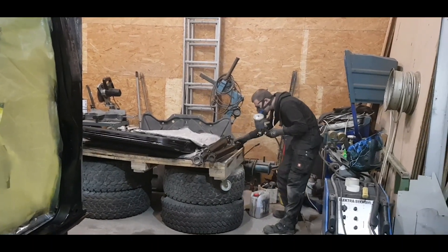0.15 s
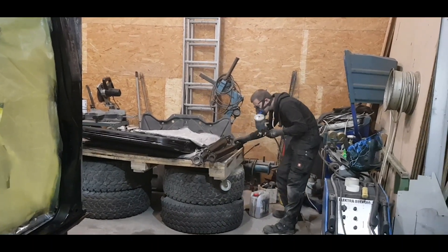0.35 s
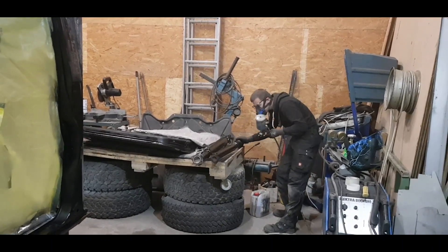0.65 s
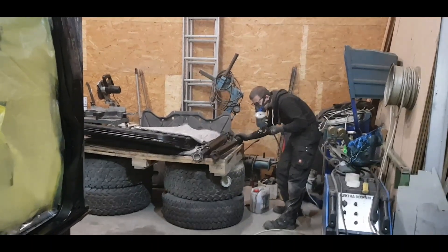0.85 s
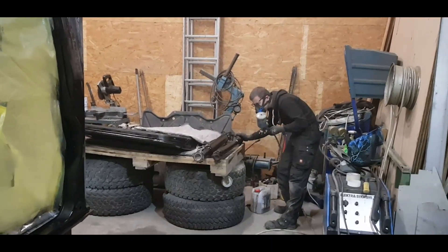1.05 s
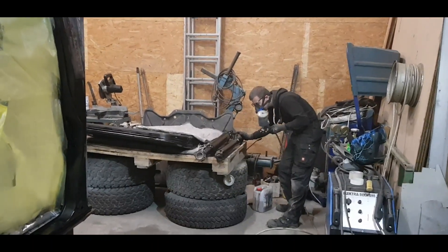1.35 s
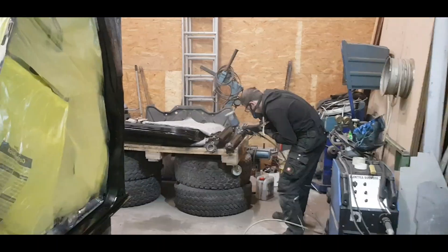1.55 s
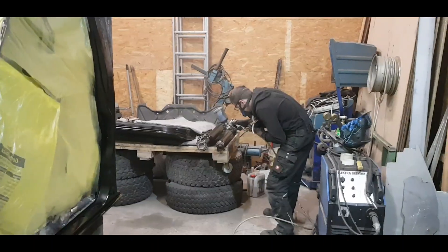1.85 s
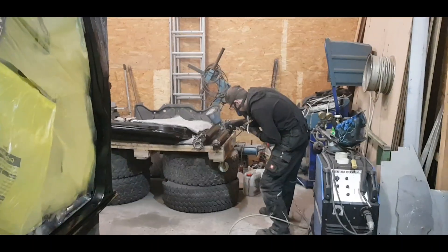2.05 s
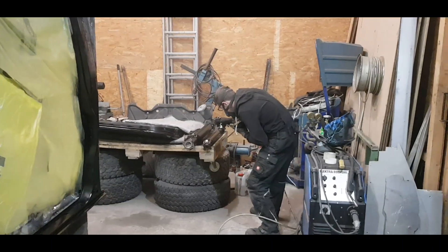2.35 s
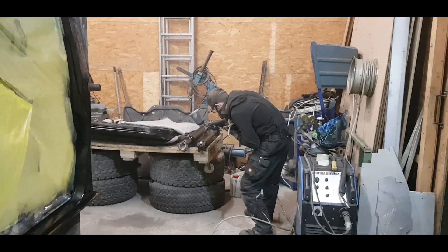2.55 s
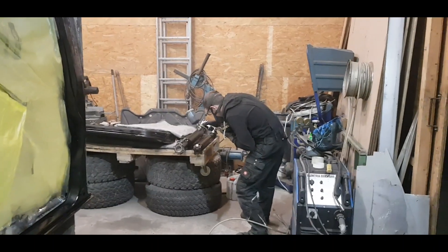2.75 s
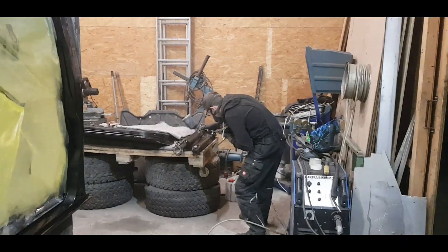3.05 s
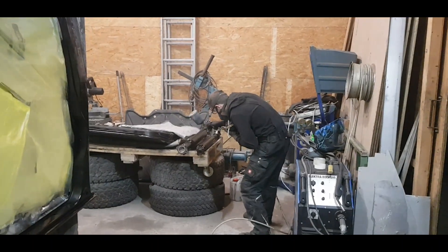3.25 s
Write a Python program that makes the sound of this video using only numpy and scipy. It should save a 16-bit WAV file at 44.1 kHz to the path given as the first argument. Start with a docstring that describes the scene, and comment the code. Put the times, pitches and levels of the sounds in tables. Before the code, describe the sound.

A spray gun hisses in four short bright bursts after a droning compressor cuts out abruptly.

```python
"""A compressor drones, its intake honking once a turn, over a steady hiss of air, then cuts out abruptly.
After a silent gap a spray gun paints in four short, bright passes, the first already under way.
Soft low puffs mark some moves of its valve, and the room rings briefly after each pass.
Drone and honk are sine waves timed by one shaft; air and spray are coloured stereo noise."""
import sys
import numpy as np
from scipy import signal
from scipy.fft import rfft, irfft, next_fast_len
from scipy.io import wavfile
from scipy.ndimage import map_coordinates

SR = 44100
rng = np.random.default_rng(int(sys.argv[2]) if len(sys.argv) > 2 else 0)


def materialize(psi):
    """Save the field psi as 16-bit PCM at rate SR to the path in sys.argv[1].

    A 1-D psi becomes a single channel; in a 2-D psi each row is a channel.
    """
    bounded = np.clip(np.atleast_2d(psi).T, -1, 1)
    quanta = np.round(bounded * 32767).astype(np.int16)
    wavfile.write(sys.argv[1], SR, quanta)


N = 149940  # 3.4 s

# How alike left and right are in the air and the room tone.
# Each row: frequency in Hz, left-right correlation (1 = mono, 0 = unrelated).
AIR_LIKENESS = [(150, 0.95), (400, 0.55), (800, 0.25), (1200, 0.12), (3000, 0)]


def amp(db):
    """Decibels to amplitude."""
    return 10 ** (np.asarray(db) / 20)


def unit(x):
    """Scale to an rms of 1."""
    return x / np.sqrt(np.mean(x ** 2) + 1e-20)


def seconds():
    """The time of every sample, in seconds."""
    return np.arange(N) / SR


def along(points, hz):
    """Read a curve of (Hz, value) points along a log frequency axis."""
    point_hz, value = np.transpose(points)
    return np.interp(np.log(hz + 1), np.log(point_hz + 1), value)


def wobble(rate):
    """A smooth random curve with the given number of knots a second."""
    knots = rng.standard_normal(int(N * rate / SR) + 4)
    return map_coordinates(knots, [seconds() * rate])


def filtered(x, response):
    """Shape the spectrum of x by a response given as a function of frequency in Hz."""
    size = next_fast_len(N + SR // 2)
    shaped = rfft(x, size) * response(np.fft.rfftfreq(size, 1 / SR))
    return irfft(shaped, size)[..., :N]


def rush(spectrum, alike, balance=None):
    """Stereo noise of rms 1: mid and side noise mixed to set colour, likeness and balance."""
    def mid_side_gain(hz):
        # cos^2 - sin^2 of this angle is the left-right correlation
        angle = np.arccos(np.clip(along(alike, hz), -1, 1)) / 2
        return amp(along(spectrum, hz)) * [np.cos(angle), np.sin(angle)]

    mid, side = filtered(rng.standard_normal((2, N)), mid_side_gain)
    pair = np.array([mid + side, mid - side])
    if balance is not None:
        pair = filtered(pair, lambda hz: amp(np.outer([.5, -.5], along(balance, hz))))
    return unit(pair)


def walls(pair, drift, count=8):
    """Comb-like colour from a few near walls, shifting as the echo delays drift; rms 1."""
    echo_strength, near_s, far_s = 0.19, .002, .014
    hz, t, bins = signal.stft(pair, SR, nperseg=1024)
    comb = np.ones(bins.shape[1:], complex)
    for place, speed in zip(rng.random(count), rng.standard_normal(count)):
        delay = near_s + (far_s - near_s) * place + drift * speed * t
        comb += echo_strength * np.exp(-2j * np.pi * np.outer(hz, delay))
    # only the size of the comb is used: it colours the noise and leaves its phase alone
    return unit(signal.istft(bins * np.abs(comb), SR, nperseg=1024)[1][:, :N])


def in_room(noise, flow):
    """Noise played at the given flow; in each band the room fills and dies away at its own speed."""
    # Reverberation of the workshop. Each row: frequency in Hz, time to fall 60 dB in seconds.
    decay = [(100, 0.44), (1000, .65), (4000, 0.56), (8000, 0.37), (14000, 0.26)]
    room_share = 0.71  # part of the power that goes through the room
    hz, t, bins = signal.stft(noise, SR, nperseg=128)
    power = np.interp(t, seconds(), flow ** 2)
    keep = amp(-120 * t[1] / np.maximum(along(decay, hz), .02))  # power kept from one frame to the next
    stored = np.array([signal.lfilter([1 - k], [1, -k], power) for k in keep])
    share = np.clip(room_share, 0, 1)
    level = np.sqrt((1 - share) * power + share * stored)
    return signal.istft(bins * level, SR, nperseg=128)[1][:, :N]


def room_tone():
    """Faint steady noise that lies under the spraying."""
    # Colour of the quiet room. Each row: frequency in Hz, relative level in dB per Hz.
    spectrum = [(30, 2), (120, -11), (500, -6), (2000, -4), (6000, -1), (15000, -10)]
    return amp(-54.5) * rush(spectrum, AIR_LIKENESS)


def rumble():
    """Steady low noise of the running machine."""
    # Colour of the machine noise. Each row: frequency in Hz, relative level in dB per Hz.
    spectrum = [(25, -26), (60, -18), (90, -7.5), (125, -5), (170, -11), (215, -21.5), (330, -14),
                (520, -19.5), (900, -14.5), (1400, -33.5), (2200, -33.5)]
    return amp(-31.5) * rush(spectrum, AIR_LIKENESS)


def air_hiss(turns):
    """Hissing noise, slowly rising, with a slight throb twice a turn of the shaft."""
    # Colour of the hiss. Each row: frequency in Hz, relative level in dB per Hz.
    spectrum = [(590, -22), (1000, -2.5), (1450, -3.5), (2000, -8), (2450, -8), (3700, -10), (4800, -5),
                (5450, -9), (6150, -8.5), (7000, -15), (7850, -11), (8700, -15), (9600, -9), (10700, -11),
                (12000, -15.5), (13600, -18.5), (14300, -17.5), (15400, -32.5)]
    # Lean of the hiss to one side. Each row: frequency in Hz, left over right in dB.
    balance = [(700, -5), (1300, 1.8), (2400, 2), (4400, 0.5), (6000, -1.5), (8000, 9.5), (10000, 2.5),
               (12000, -.5)]
    start_db, rise_db_per_s, waver_db, throb_depth = -30, 1.5, 0.24, 0.065
    echo_drift = .00008  # typical change of the echo delays, s per s
    throb = 1 + throb_depth * np.cos(2 * np.pi * 2 * turns)
    level = amp(start_db + rise_db_per_s * seconds() + waver_db * wobble(8))
    return level * throb * walls(rush(spectrum, AIR_LIKENESS, balance), echo_drift)


def intake(turns):
    """The intake honks: a rough, wandering resonance that swells once a turn."""
    # Path of the honk. Each row: time in seconds, resonance in Hz, level in dB before the trim.
    path = [(0, 832, -39), (.26, 831.6, -31.5), (.38, 795, -28.5), (.48, 797, -27.5), (.54, 831, -28),
            (.58, 827.5, -39), (.75, 844.6, -32), (0.851, 810, -28), (0.891, 803.8, -41),
            (.94, 793.6, -28.5), (1.049, 830.3, -31), (1.2, 828, -37), (1.3, 827, -28.5),
            (1.45, 800.5, -33.5), (1.55, 822, -37)]
    trim_db, swell_depth, roughness = -4, 0.38, 0.59
    time_s, hz, db = np.transpose(path)
    phase = 2 * np.pi * np.cumsum(np.interp(seconds(), time_s, hz)) / SR
    # separate random curves for left and right, in size and phase
    rough = np.array([wobble(69.5) + 1j * wobble(70) for _ in range(2)])
    tone = np.real((1 + roughness * rough) * np.exp(1j * phase))
    honk = tone * (1 + swell_depth * np.cos(2 * np.pi * turns))
    return amp(np.interp(seconds(), time_s, db) + trim_db) * unit(honk)


def drone(turns):
    """Multiples of the shaft rate hum together, each wavering a little in level."""
    # Hum of the compressor. Each row: multiple of the shaft rate, relative level in dB.
    partials = [(1, -26.5), (2, -12), (3, -20.5), (4, -6), (5, -10.5), (6, 1), (7, -22), (8, -21), (9, -36),
                (10, -13.5), (11, -26.5), (12, -28.5), (13, -28.5), (14, -17.5), (15, -26), (16, -21.5),
                (17, -27), (18, -24.5), (19, -22.5), (20, -34), (21, -34.5), (22, -27.5), (23, -25.5),
                (24, -27), (25, -58.5), (26, -40.5), (27, -20.5), (28, -28), (29, -23.5), (30, -20),
                (31, -19.5), (32, -16), (33, -19), (34, -15.5), (35, -22)]
    drone_db, waver_db = -23, 1.07
    hum = np.zeros(N)
    for multiple, db in partials:
        level = amp(db + waver_db * wobble(6))
        hum += level * np.sin(2 * np.pi * (multiple * turns + rng.random()))
    return amp(drone_db) * unit(hum)


def compressor():
    """One slightly unsteady shaft drives the drone, the intake and the throb of the hiss."""
    shaft_hz, speed_drift = 24.995, 0.0014  # turns a second, and their relative unsteadiness
    turns = np.cumsum(shaft_hz * (1 + speed_drift * wobble(4.7))) / SR
    return rumble() + air_hiss(turns) + intake(turns) + drone(turns)


def puffs():
    """One damped low push for each jolt of the air valve."""
    # Jolts of the valve. Each row: start in seconds, level in dB before rise and decay.
    jolts = [(2.021, -36), (2.573, -37), (2.84, -44), (3.031, -42)]
    puff_hz, t60_s, rise_s = 69, 0.051, 0.0018
    out = np.zeros(N)
    for start_s, db in jolts:
        age = np.maximum(seconds() - start_s, 0)
        rise = 1 - np.exp(-age / rise_s)  # zero until the start
        out += amp(db - 60 * age / t60_s) * rise * np.cos(2 * np.pi * puff_hz * age)
    return out


def spray_gun():
    """A jet of noise opens quickly, flutters, drifts in level through each pass, and shuts."""
    # Spray passes. Each row: trigger pulled in seconds, released in seconds, level in dB,
    # sag in dB per second (negative swells).
    passes = [(1.564, 1.801, -19, 3), (2.009, 2.354, -18.5, 9), (2.539, 2.811, -20, -2),
              (3.009, 3.307, -18.5, 8.5)]
    # Colour of the jet. Each row: frequency in Hz, relative level in dB per Hz.
    spectrum = [(30, -36), (70, -17.5), (105, -16), (150, -14.5), (230, -16.5), (340, -19.5), (550, -16.5),
                (850, -18.5), (1400, -18), (2400, -15.5), (3700, -12.5), (4400, -9.5), (6000, -7),
                (6700, -7.5), (7600, -5.5), (8900, -6), (11500, 0.95), (13300, 2), (15400, -6)]
    # Lean of the jet to one side. Each row: frequency in Hz, left over right in dB.
    balance = [(100, 1.5), (400, 2.5), (2400, 2), (4400, -0.5), (6000, -2), (7000, 3), (8200, 5),
               (10000, 3), (11500, -3), (13500, -1.5), (15400, -4)]
    # Stereo likeness of the jet. Each row: frequency in Hz, left-right correlation.
    likeness = [(200, .75), (800, 0.58), (1600, -0.28), (3000, 0.12), (4300, 0.34), (6000, 0.066),
                (10000, 0.21), (13000, -0.12), (14200, 0.34)]
    attack_s, release_s, flutter_db = 0.011, 0.029, 0.8
    echo_drift = .0005  # typical change of the echo delays, s per s
    t, flow = seconds(), np.zeros(N)
    for pulled, released, db, sag_db in passes:
        age = np.maximum(t - pulled, 0)
        opening = 1 - np.exp(-age / attack_s)
        closing = np.exp(-np.maximum(t - released, 0) / release_s)
        flow += amp(db - sag_db * age) * opening * closing
    flutter = amp(flutter_db * wobble(120))
    return in_room(walls(rush(spectrum, likeness, balance), echo_drift), flow * flutter)


def scene():
    """The compressor, a silent gap, then the spraying."""
    cut_s, resume_s, fade_s = 1.566, 1.661, .002
    t = seconds()
    before = np.clip((cut_s - t) / fade_s, 0, 1)
    after = np.clip((t - resume_s) / fade_s, 0, 1)
    return before * compressor() + after * (room_tone() + puffs() + spray_gun())


def record(dry):
    """A very steep low-pass removes the treble above the band limit."""
    top_hz = 15520
    # the cap of 1.2 keeps the high power from overflowing
    return filtered(dry, lambda hz: 1 / (1 + np.minimum(hz / top_hz, 1.2) ** 400))


dry = scene()
out = record(dry)
materialize(out)
```